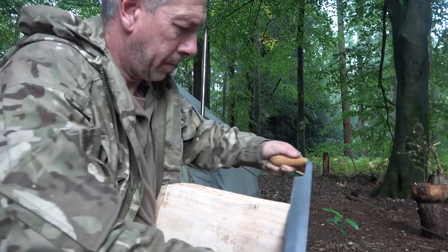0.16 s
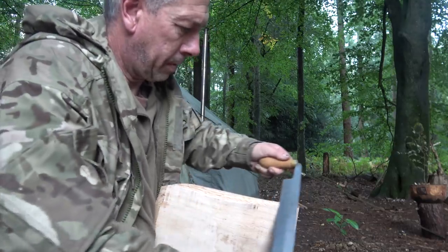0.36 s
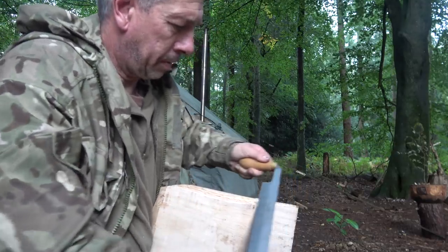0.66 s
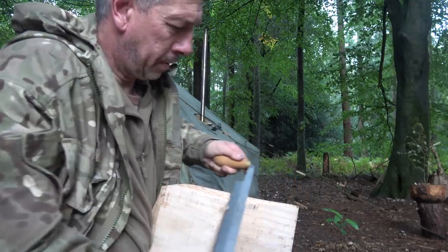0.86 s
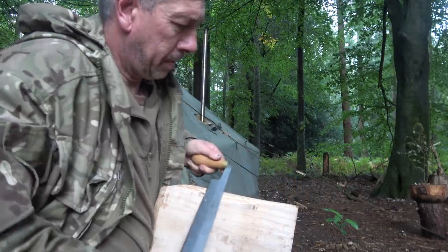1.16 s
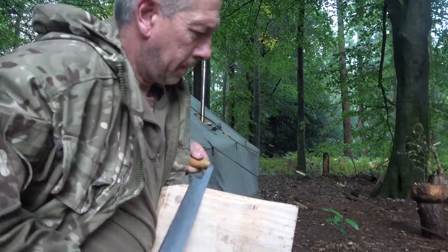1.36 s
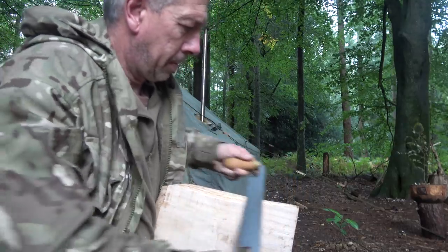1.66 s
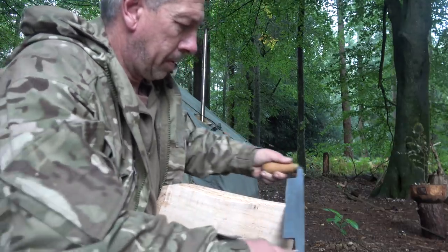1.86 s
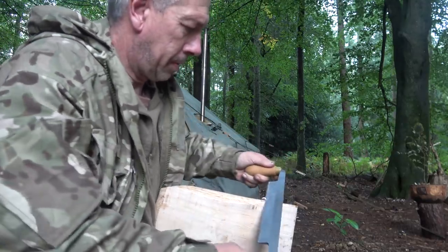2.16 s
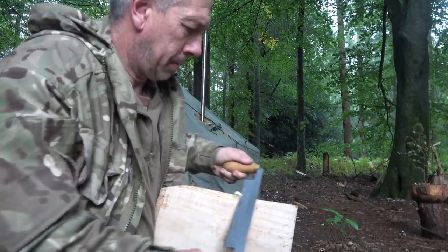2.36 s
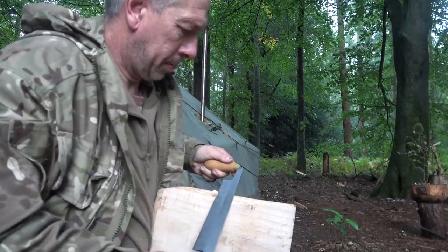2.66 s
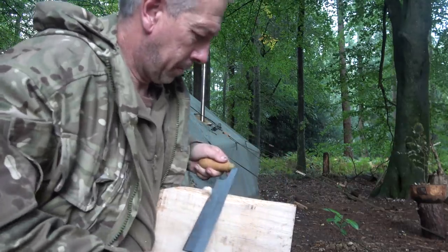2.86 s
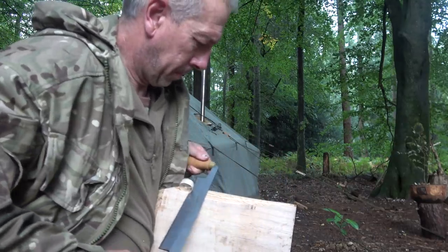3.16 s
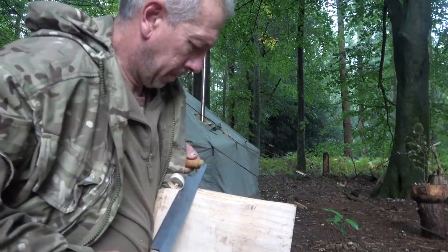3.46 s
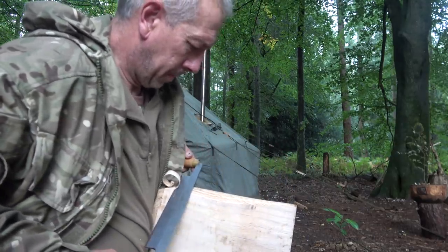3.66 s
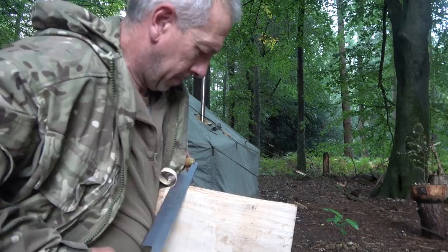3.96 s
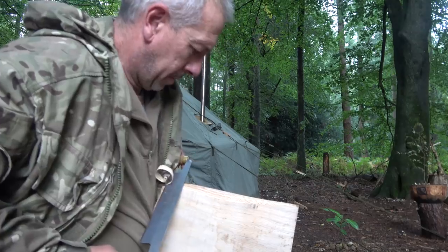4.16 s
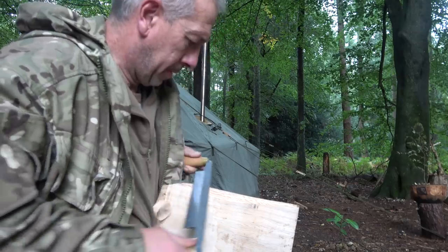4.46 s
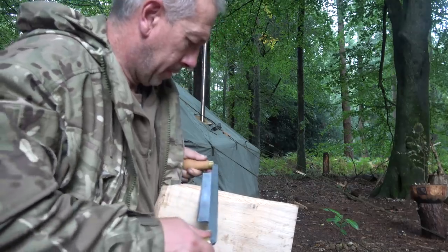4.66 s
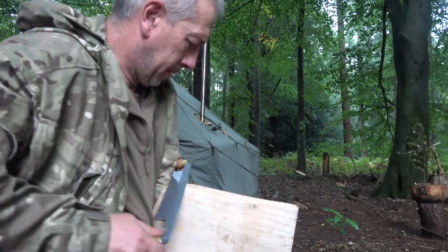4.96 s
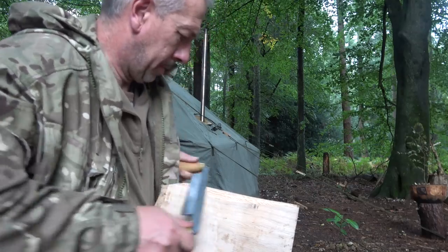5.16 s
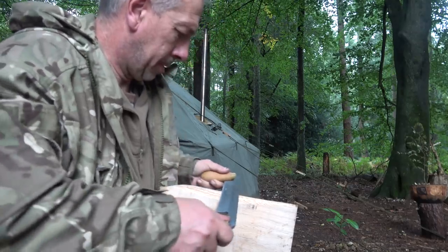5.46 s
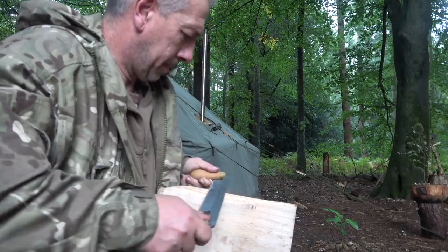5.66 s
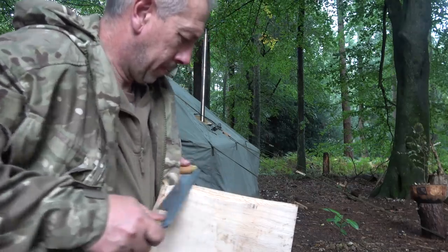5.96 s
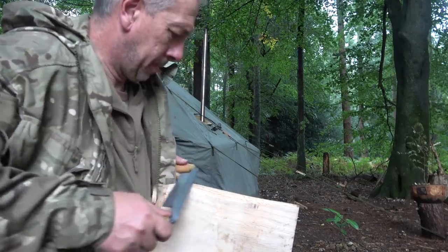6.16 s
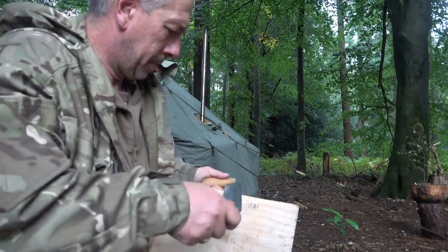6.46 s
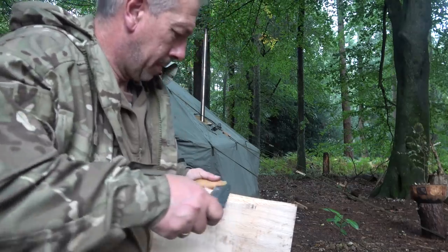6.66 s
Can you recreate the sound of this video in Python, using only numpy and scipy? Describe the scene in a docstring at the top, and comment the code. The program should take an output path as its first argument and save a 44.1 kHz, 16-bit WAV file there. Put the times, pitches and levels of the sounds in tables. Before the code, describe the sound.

Close, repeated scrapes of a steel blade on wood, with light cracks and knocks over a faint hush of trees.

```python
"""Short rasping, ringing strokes sound close by: a drawknife shaves an oak board in a quiet wood.
The edge tears fibres, and this irregular force drives the resonances of blade and board:
the steel rings and chatters, the oak thrums. Splinters snap, the tool knocks the wood, the bench
is jolted and a sleeve swishes. Behind the work lie the hush of the trees and a faint bird."""
import sys
import numpy as np
from scipy import signal
from scipy.fft import rfft, irfft, next_fast_len
from scipy.io import wavfile
from scipy.ndimage import map_coordinates

SR = 44100
rng = np.random.default_rng(int(sys.argv[2]) if len(sys.argv) > 2 else 0)


def pcm_store(signal):
    """Save signal as 16-bit PCM."""
    levels = np.round(np.clip(np.atleast_2d(signal), -1, 1) * 32767)
    wavfile.write(sys.argv[1], SR, levels.astype(np.int16).T)


N = 299880

# modes of the steel blade: pitch_hz, bandwidth_hz, gain_db
BLADE_MODES = [(1528, 74, 1), (2133, 340, -2.5), (2704, 60, -1.5), (3340, 360, -4.5), (3680, 85, 2.5),
               (4517, 90, 2), (4960, 140, 0.5), (5900, 136, 1), (6890, 86, 0), (7320, 115, -4.5),
               (8250, 110, -4.5), (9100, 160, -11), (9450, 110, -8), (9960, 340, -11.5), (12200, 260, -11)]
# left-right coherence of a nearby source: frequency_hz, coherence (0 to 1)
NEAR_COHERENCE = [(300, 1), (1200, 1), (2200, 0.97), (4500, 0.92), (8500, 0.79), (13000, 0.55)]


def shaving():
    """Forced vibration: tearing fibres drive the blade, while drag and friction shake the board."""
    # spectrum of tearing oak: frequency_hz, gain_db
    tear_spectrum = [(200, -57), (700, -26), (1400, -16), (2000, 1.5), (3000, 0), (5000, -1), (7000, -3.5),
                     (8500, -6.5), (10500, -14), (16000, -30)]
    # dull rub of the bevel, with the drone it sends into the bench: frequency_hz, gain_db
    rub_spectrum = [(60, -25), (125, -8.5), (210, -13), (400, -9.5), (720, -4), (1100, 1.5), (1400, -3),
                    (1900, -8.5), (4000, -40)]
    tear_db, board_db, hiss_db, bevel_db = strokes()
    tearing = stereo(friction(rate=2600, spread_db=-1.5, sliding=0.76, clump_db=1.26),
                     spectrum(tear_spectrum))
    steel = blade(friction(rate=1800, spread_db=-0.5, sliding=0.78, clump_db=0.44))
    # the harder the edge bites, the larger the steel's share of the power
    bite = np.clip(0.7 + 0.036 * (tear_db + 40.5), 0.05, 0.85)
    cut = np.sqrt(1 - bite) * tearing + np.sqrt(bite) * steel
    cut = amp(-0.54) * board_reflection(cut, delay_s=0.0023, gain=0.41)
    cut += chatter(friction(rate=1600, spread_db=0.5, sliding=0.54, clump_db=0.8))
    hiss = stereo(friction(rate=2600, spread_db=5, sliding=0.88, clump_db=2.0), hiss_response)
    hiss = amp(-1) * board_reflection(hiss, delay_s=0.0012, gain=0.34) + amp(-6.5) * crackle()
    thrum = stereo(friction(rate=500, spread_db=0, sliding=0.32, clump_db=0.2),
                   lambda f: board_response(f) / (1 + (f / 1500) ** 2))
    rub = stereo(friction(rate=1500, spread_db=2.5, sliding=0.66, clump_db=1.5), spectrum(rub_spectrum))
    rub_db = -49.5 + 0.75 * (bevel_db + 45.5)  # the rub grows more slowly than the pressure
    return amp(tear_db) * cut + amp(hiss_db) * hiss + amp(board_db - 2.0) * thrum + amp(rub_db) * rub


def strokes():
    """Incoherent sounds add in power: dB envelopes of tearing, thrum, hiss and bevel pressure."""
    # pulls and light returns of the knife, the last three columns relative to the tearing:
    # start_s, build_s, ease_s, release_s, crest_db, swell_db, board_db, hiss_db, bevel_db
    pulls = [(0.0, 0.054, 0.11, 0.068, -41, 6.3, 0, -8.5, -1),
             (.435, 0.012, 0.081, 0.03, -44, 5, -13, -7, -4),
             (0.675, 0.044, 0.088, 0.024, -42, 5.5, -7.5, -4.5, -3.5),
             (.86, 0.08, 0.02, 0.04, -44, 1.5, -6, -5.5, 2),
             (.975, 0.013, 0.071, 0.039, -40.5, 5.4, -5.5, -12, 0),
             (1.1, 0.2, 0.012, 0.031, -46, 0.7, -3.5, -5, -0.5),
             (1.365, 0.013, 0.061, 0.026, -47, 3.9, -6.5, -11, 2),
             (1.565, 0.052, 0.14, 0.035, -49, 5.7, -8, -7, 2),
             (1.78, 0.0082, 0.2, 0.046, -45.5, 14, 1, -20, 0.5),
             (2.12, 0.055, 0.015, 0.027, -43.5, 1.4, -6.5, -9, -2.5),
             (2.313, 0.036, 0.105, 0.039, -42, 3.8, -7, -7.5, -2),
             (2.503, 0.0077, 0.092, 0.042, -43.5, 4.1, -7.5, -7, -2),
             (2.68, .015, .015, .02, -56, 1, -1, -7, 0),
             (2.75, 0.018, 0.026, 0.033, -43.5, 6.3, -4, -8.5, 0.5),
             (2.92, 0.082, 0.04, 0.032, -40.5, 7.3, -5.5, -0.5, -1),
             (3.09, 0.14, 0.078, 0.041, -47, 6.9, -5, -2.5, 2),
             (3.375, 0.042, 0.038, 0.015, -49, 2.6, -5, -5, 0.5),
             (3.56, 0.076, 0.039, 0.016, -48.5, 5.9, -4, -2.5, 0),
             (3.883, 0.0093, 0.024, 0.022, -50.5, 4.4, -4, -8, 1.5),
             (4.028, 0.007, 0.079, 0.011, -48, 7.3, -3.5, 1.5, 5),
             (4.14, .03, 0.063, 0.027, -56.5, 2.5, -6, -16, -1),
             (4.401, 0.15, 0.083, 0.033, -47, 1.5, 0.5, -27, -1.5),
             (4.75, 0.2, 0.096, 0.03, -43.5, 5.8, -2.5, -20, 0),
             (5.06, .02, 0.13, .032, -53.5, 1.8, -6, -2.5, 2),
             (5.24, 0.084, 0.12, 0.031, -45, 4, 4, -23, 0.5),
             (5.54, 0.24, .025, 0.041, -49, 5.2, -4, -8, -2),
             (5.795, 0.026, 0.11, 0.034, -43, 5.7, -2.5, -3, 0),
             (5.938, 0.0079, 0.033, 0.026, -40.5, 4.6, -1.5, -8.5, 2),
             (6.02, 0.014, 0.051, 0.033, -48, 4, -9, -20, 5),
             (6.24, 0.09, .01, 0.044, -51, 6.7, 0, -21, -1),
             (6.37, 0.081, 0.051, 0.041, -44, 3.7, 2, -21, 1),
             (6.63, 0.15, .05, 0.034, -50.5, 2.6, -2, -6, -0.5)]
    entry_share, steepness = 0.81, 2.03  # the edge enters faster than it lets go
    t, power = np.arange(N) / SR, np.full((4, N), 1e-12)
    for start, build, ease, release, crest_db, swell_db, board_db, hiss_db, bevel_db in pulls:
        end, base_db = start + build + ease, crest_db - swell_db
        effort_db = np.interp(t, [start, start + build, end], [base_db, crest_db, base_db])
        outside = (np.maximum(start - t, 0) / entry_share + np.maximum(t - end, 0)) / release
        effort = amp(effort_db) / (1 + outside ** steepness)
        power += (amp([[0], [board_db], [hiss_db], [bevel_db]]) * effort) ** 2
    return 10 * np.log10(power) + wobble(22)  # the grain resists unevenly


def friction(rate, spread_db, sliding, clump_db):
    """Shot noise: about rate tiny breaks a second over smooth sliding, clumped by the oak's grain."""
    noise = rng.standard_normal((2, N))
    size = amp(spread_db * np.clip(rng.standard_normal(N), -2, 2))
    breaks = (rng.random(N) < rate / SR) * size * rng.choice([-1, 1], (2, N))
    return (unit_rms(breaks) + sliding * noise) * amp(clump_db * (wobble(45) + wobble(260)))


def blade(force, drift=0.008, wander_db=2.5, wanders_per_s=14):
    """Modal resonance: as the contact travels along the edge, each mode waxes, wanes and bends."""
    out, power, n = np.zeros((2, N)), 0, np.arange(N)
    knots = n[::SR // wanders_per_s]
    for hz, width, db in BLADE_MODES:
        gain = amp(db + np.interp(n, knots, wander_db * rng.standard_normal(len(knots))))
        ring = signal.lfilter(*signal.iirpeak(hz, hz / width, SR), gain * force)
        phase_drift = 2 * np.pi * hz * drift * np.cumsum(wobble(3)) / SR
        out += np.real(signal.hilbert(ring) * np.exp(1j * phase_drift))
        power = power + gain ** 2 * width
    return stereo(out / np.sqrt(power), lambda f: 1 / (1 + (1200 / (f + 1)) ** 4))


def chatter(force, burst_db=3.0):
    """Resonant excitation: the catching edge pumps a resonance of the blade in uneven bursts."""
    # narrow squeaks and broad rasps: start_s, end_s, pitch_hz, bandwidth_hz, relative_db
    catches = [(0, .034, 3640, 220, -3), (0.052, 0.16, 6870, 400, -9.5), (.43, .55, 1700, 900, -6),
               (.69, .78, 1700, 900, -5), (.68, .77, 3800, 200, -10), (.96, 1.035, 2230, 350, -8),
               (0.95, 1.34, 8050, 300, -14), (1.17, 1.33, 7300, 300, -11), (.67, 1.33, 10050, 600, -17),
               (0.698, 1.36, 12300, 220, -17), (2.12, 2.21, 1520, 220, -7), (2.107, 2.21, 2950, 1000, -5),
               (2.1, 2.6, 3680, 450, -7), (2.33, 2.39, 1390, 600, -5), (2.33, 2.593, 6980, 450, -6),
               (2.92, 3.464, 6130, 400, -9), (3.15, 3.47, 2130, 250, -10), (3.34, 3.47, 2980, 200, -10),
               (4.44, 4.66, 3650, 170, -5), (5.25, 5.45, 3610, 220, -4), (5.39, 5.47, 4480, 300, -2),
               (5.5, 6.01, 4500, 1100, -3), (6.35, 6.49, 3620, 200, -1), (6.6, 6.85, 4440, 450, -3)]
    out = np.zeros((2, N))
    force = force * amp(burst_db * wobble(55))
    for start, end, hz, width, db in catches:
        push = force[:, int(start * SR):int(end * SR)]
        ring = stereo(push, lambda f: resonances([(hz, width, 0)], f) ** 2)
        add(out, start, amp(db) * ring * signal.windows.tukey(push.shape[1], 0.4))
    return out


def hiss_response(f, ring_db=6.5):
    """Resonant colouring: the finest breaks reach the ear partly through the modes of the steel."""
    # spectrum of the finest breaks: frequency_hz, gain_db
    hiss_spectrum = [(3000, -16), (7000, 1), (9500, -4.5), (11000, -6), (13000, -8), (16000, -18)]
    peaks = sum(1 / (1 + (2 * (f - hz) / width) ** 2) for hz, width, _ in BLADE_MODES)
    return amp(log_interp(hiss_spectrum, f)) * np.sqrt(1 + amp(ring_db) ** 2 * peaks)


def crackle(ticks_per_s=170, spread_db=2.0, decay_s=0.00087):
    """A Poisson process: coarser fibres part at random, each with a decaying tick of noise."""
    # spectrum of single fibres parting: frequency_hz, gain_db
    tick_spectrum = [(2500, -12), (6000, 0), (9000, -4), (12500, -7), (16000, -17)]
    size = amp(spread_db * np.clip(rng.standard_normal(N), -2, 1.5))
    breaks = (rng.random(N) < ticks_per_s / SR) * size
    envelope = signal.lfilter([1], [1, -np.exp(-1 / (decay_s * SR))], breaks)
    return stereo(envelope * rng.standard_normal((2, N)), spectrum(tick_spectrum))


def board_response(f, cutoff_hz=240):
    """Plate radiation: so small a board sounds at its modes and radiates little below the lowest."""
    # modes of the oak board: pitch_hz, bandwidth_hz, gain_db
    board_modes = [(353.8, 88, -3), (433.5, 103.6, 0), (534, 37.5, 4), (1073, 59, -5), (1238, 116, -2.5),
                   (1333, 36, -1), (1680, 34, -10.5), (2020, 130, -29)]
    s = 1j * f / cutoff_hz
    return resonances(board_modes, f) * s * s / (s * s + 0.57 * s + 1)


def board_reflection(direct, delay_s, gain):
    """Comb filtering: the board reflects the cut over a path that shifts as the hands move."""
    n = np.arange(N)
    delayed = n - delay_s * SR * (1 + 0.065 * wobble(2))
    reflected = np.array([np.interp(delayed, n, channel) for channel in direct])
    return unit_rms(direct + gain * reflected)


def snaps():
    """Brittle fracture: a splinter lets go in a burst of cracks that rings both blade and board."""
    # breaking splinters: time_s, peak_db, low_hz, high_hz, length_s
    splinters = [(0.0547, -14.5, 200, 10000, 0.004), (1.763, -24, 200, 6500, 0.0025),
                 (2.183, -23.5, 300, 7060, 0.01), (2.3054, -23.5, 200, 7600, 0.0096),
                 (2.357, -26.5, 700, 9000, 0.0088), (2.39, -29, 2500, 9000, .004),
                 (2.507, -33, 1500, 7000, .005), (2.749, -36, 4000, 9000, .012),
                 (2.997, -31, 3000, 11000, .007), (3.617, -31, 5000, 12000, 0.0016),
                 (3.997, -38.5, 400, 1280, 0.00089), (4.035, -37, 500, 6000, .009),
                 (4.076, -25, 3200, 13000, 0.0058), (4.105, -38, 1100, 3500, .022),
                 (4.119, -32, 1200, 8500, 0.0007), (4.1378, -35, 1500, 4500, .0006),
                 (4.165, -32.5, 700, 2400, 0.0021), (4.1712, -34, 6500, 9000, 0.00066),
                 (4.178, -34.5, 1100, 4500, 0.0009), (4.2316, -33.5, 1000, 7000, 0.00089),
                 (4.734, -33.5, 300, 7500, 0.02), (4.9849, -23.5, 500, 8560, 0.0074),
                 (4.999, -30.5, 700, 6000, 0.0086), (5.927, -25.5, 300, 12900, 0.0057),
                 (5.9417, -19.5, 300, 11000, 0.004)]
    out, t = np.zeros((2, N)), np.arange(-SR // 20, SR // 10) / SR
    for time_s, db, low_hz, high_hz, length_s in splinters:
        def response(f):
            direct, steel = resonances([(4200, 35000, 0)], f), 0.1 * resonances(BLADE_MODES, f)
            oak = 7.9 * board_response(f) * f / (f + 2500)
            band_loss = np.sqrt((1 + (f / high_hz) ** 8) * (1 + (low_hz / (f + 1)) ** 6))
            return (direct + steel + oak) / band_loss
        from_crest = np.abs(t / length_s - 0.45)
        envelope = np.exp(-(from_crest / 0.33) ** 2) + amp(-2) * np.exp(-from_crest / 0.65)
        snap = stereo(envelope * rng.standard_normal((2, len(t))), response)
        add(out, time_s + t[0], amp(db) * snap / np.abs(snap).max())
    return out


def knocks(ring_db=-30, rattle_depth=0.5):
    """Impact and free decay: the board thuds and the blade rings on, rattling against the wood."""
    # bumps of the tool, duller the longer the contact: time_s, level_db, contact_s
    bumps = [(.002, -27.5, 0.00021), (0.027, -20.5, 0.000074), (.051, -25, 0.000039), (0.072, -31, 0.00031),
             (0.127, -33, 0.001), (1.7627, -10.5, 0.00014), (2.695, -41, .0003), (2.803, -35, 0.00082),
             (4.19, -45, .00005), (4.557, -30, 0.0012), (4.989, -31, 0.00002), (5.26, -32.5, 0.0004),
             (5.927, -28, 0.00034), (5.945, -29, 0.000095), (6.409, -28.5, 0.00014),
             (6.465, -30.5, 0.00033)]
    # freely ringing modes of the blade: pitch_hz, gain_db, t60_s
    ring_modes = [(1500, 2, .05), (2730, 2, 0.19), (3700, 2, 0.19), (4510, -2, .06), (5890, -2, .07),
                  (6890, 3, .09), (7300, -1, .08)]
    out, t = np.zeros(N), np.arange(SR // 4) / SR
    for time_s, db, contact_s in bumps:
        thud = filtered(np.exp(-t / contact_s), board_response)
        ring = sum(amp(gain_db + rng.normal(0, 1.5) - 60 * t / t60) * np.sin(2 * np.pi * hz * t)
                   for hz, gain_db, t60 in ring_modes)
        ring *= 1 + rattle_depth * wobble(180)[:len(t)]
        add(out, time_s, amp(db) * (thud / np.abs(thud).max() + amp(ring_db) * ring))
    return out


def bench(pitch_hz=113.5, t60_s=0.14, rise_s=0.0087):
    """A damped oscillator: the heavy bench answers each jolt with one low, soft note."""
    # jolts of the bench under the board: time_s, level_db
    jolts = [(1.765, -41), (2.359, -57), (4.079, -48), (5.829, -40), (5.862, -48), (5.951, -49)]
    out, t = np.zeros(N), np.arange(SR // 2) / SR
    note = (1 - np.exp(-t / rise_s)) * amp(-60 * t / t60_s) * np.sin(2 * np.pi * pitch_hz * t)
    for time_s, db in jolts:
        add(out, time_s, amp(db) * note)
    return out * amp([[1], [-1]])  # slightly to the left


def sleeve():
    """Friction noise: woven cloth slides over itself as the arm reaches back."""
    # slides of the jacket sleeve: start_s, end_s, level_db
    slides = [(.2, 0.704, -56), (1.359, 1.656, -60), (4.044, 4.424, -59), (5.0, 5.253, -61)]
    # spectrum of rubbing cloth: frequency_hz, gain_db
    cloth_spectrum = [(1500, -30), (3500, -25), (5500, 12), (7300, 19), (8300, -28), (11000, -45)]
    out = np.zeros((2, N))
    for start, end, db in slides:
        swell = np.hanning(int((end - start) * SR))
        swish = stereo(rng.standard_normal((2, len(swell))), spectrum(cloth_spectrum))
        add(out, start, amp(db) * swell * swish)
    return out


def trees():
    """A diffuse field: the steady hush of the trees reaches left and right only partly coherent."""
    # spectrum of the hush: frequency_hz, gain_db
    hush_spectrum = [(20, 1.5), (60, -3), (130, -5), (230, -7), (430, -1), (750, -2.5), (1200, -2),
                     (1600, -9), (2200, -10.5), (3500, -11.5), (7000, -11.5), (10000, -15.5), (15500, -15)]
    # left-right coherence of distant sound: frequency_hz, coherence (0 to 1)
    far_coherence = [(30, 0.43), (120, 0.18), (300, 0.36), (1200, 0.8), (3000, 0.057), (8000, 0.028),
                     (13000, 0.02)]
    level_db = -54.5 + 0.18 * wobble(3.1)
    return amp(level_db) * stereo(rng.standard_normal((2, N)), spectrum(hush_spectrum), far_coherence)


def bird(level_db=-61, blur_hz=220):
    """Scattering: the trunks blur two thin, gliding notes of a far bird into narrow bands of noise."""
    # the bird's notes: start_s, length_s, start_hz, end_hz
    notes = [(1.998, 0.089, 4660, 4930), (2.808, 0.12, 4730, 4600)]
    out = np.zeros(N)
    for start_s, length_s, start_hz, end_hz in notes:
        pitch = np.linspace(start_hz, end_hz, int(length_s * SR))
        scatter = (wobble(blur_hz) + 1j * wobble(blur_hz))[:len(pitch)]
        note = unit_rms(np.real(scatter * np.exp(2j * np.pi * np.cumsum(pitch) / SR)))
        add(out, start_s, amp(level_db) * np.hanning(len(pitch)) * note)
    return out


def resonances(modes, f):
    """Modal superposition: damped resonators (pitch_hz, bandwidth_hz, gain_db) of alternating sign."""
    return sum((-1) ** k * amp(db) * 1j * f * width / (hz * hz - f * f + 1j * f * width)
               for k, (hz, width, db) in enumerate(modes))


def stereo(pair, response, coherence=NEAR_COHERENCE):
    """Mid-side mixing: two unrelated signals become a filtered, partly coherent pair of rms 1."""
    def split(f):
        angle = np.arccos(np.clip(log_interp(coherence, f), -1, 1)) / 2
        return response(f) * np.array([np.cos(angle), np.sin(angle)])
    mid, side = filtered(pair, split)
    return unit_rms(np.array([mid + side, mid - side]))


def filtered(x, response):
    """Convolution: the spectrum of x is multiplied by a frequency response."""
    n = x.shape[-1]
    padded = next_fast_len(n + 8192, True)
    return irfft(rfft(x, padded) * response(np.fft.rfftfreq(padded, 1 / SR)), padded)[..., :n]


def spectrum(points):
    """The frequency response through (frequency_hz, gain_db) points."""
    return lambda f: amp(log_interp(points, f))


def log_interp(points, hz):
    """Interpolation of (frequency_hz, value) points on a logarithmic frequency axis."""
    frequencies, values = np.transpose(points)
    return np.interp(np.log(hz + 1), np.log(frequencies + 1), values)


def wobble(rate):
    """A smooth random curve with rate knots a second."""
    return map_coordinates(rng.standard_normal(int(N * rate / SR) + 4), [np.arange(N) * rate / SR])


def amp(db):
    """Decibels to amplitude ratio."""
    return 10 ** (np.asarray(db) / 20)


def unit_rms(x):
    """Normalisation to rms 1."""
    return x / np.sqrt(np.mean(x ** 2) + 1e-20)


def add(track, start_s, sound):
    """Superposition of a sound on a track from start_s."""
    part = track[..., max(round(start_s * SR), 0):][..., :sound.shape[-1]]
    part += sound[..., :part.shape[-1]]


def scene():
    """Free-field superposition: the work is close and almost central; the open wood gives no echo."""
    work = shaving() + snaps() + knocks() + sleeve()
    return work * amp([[-0.15], [0.15]]) + bench() + trees() + bird()


def record(dry):
    """Band limiting: an ideal low-pass filter removes the highest treble."""
    cutoff_hz = 15800
    return filtered(dry, lambda f: f < cutoff_hz)


dry = scene()
out = record(dry)
pcm_store(out)
```